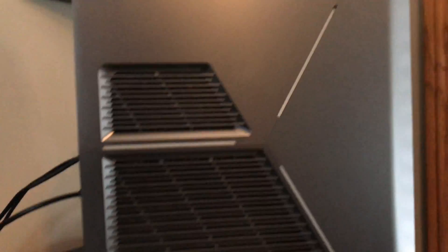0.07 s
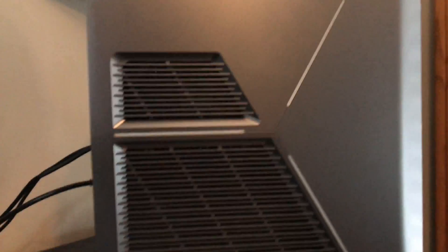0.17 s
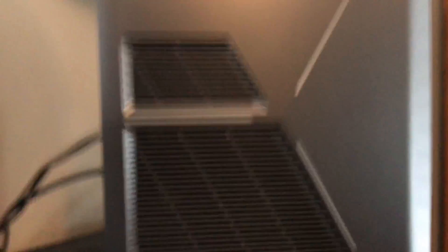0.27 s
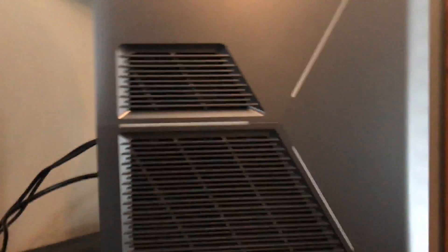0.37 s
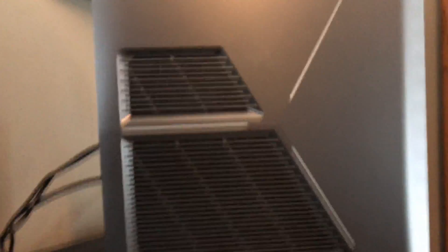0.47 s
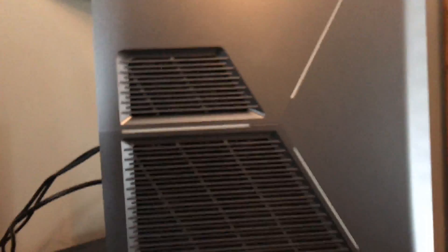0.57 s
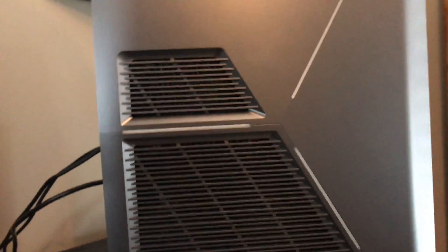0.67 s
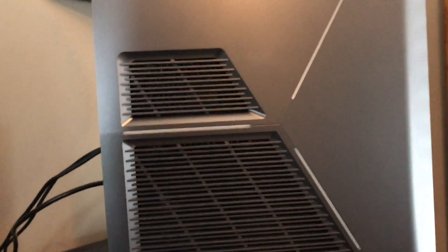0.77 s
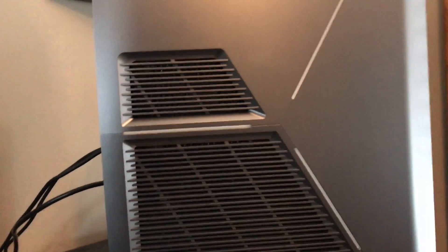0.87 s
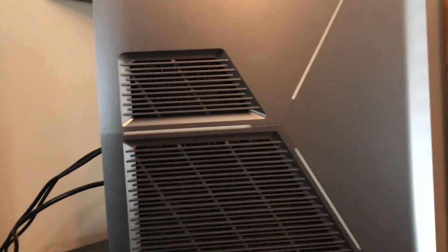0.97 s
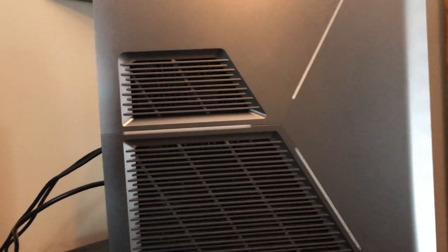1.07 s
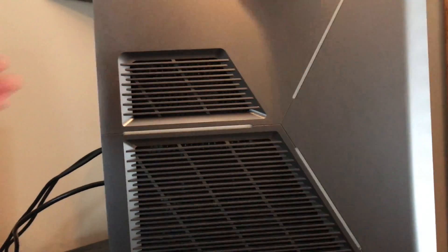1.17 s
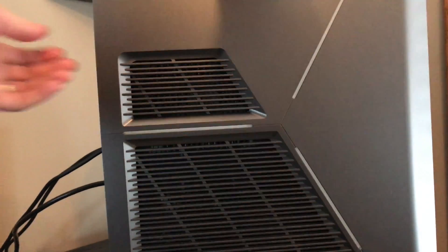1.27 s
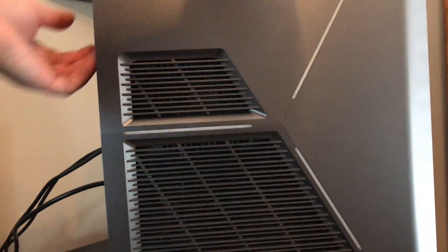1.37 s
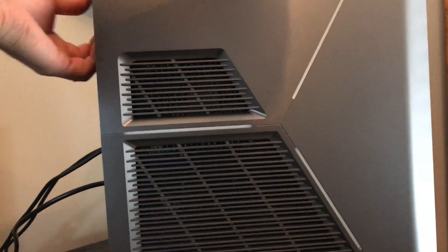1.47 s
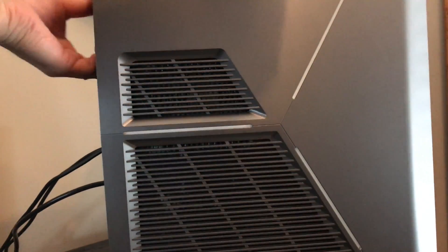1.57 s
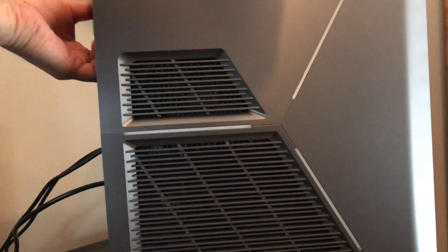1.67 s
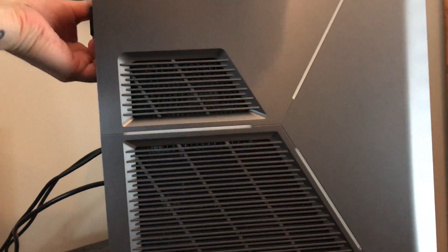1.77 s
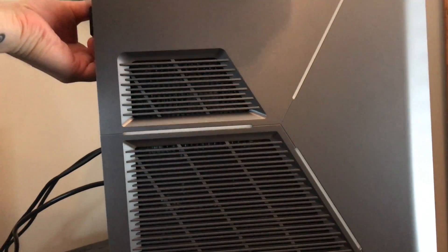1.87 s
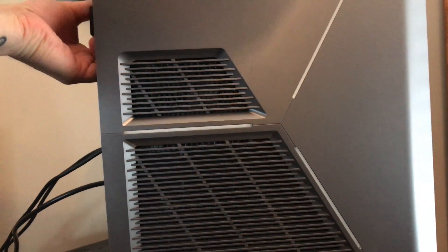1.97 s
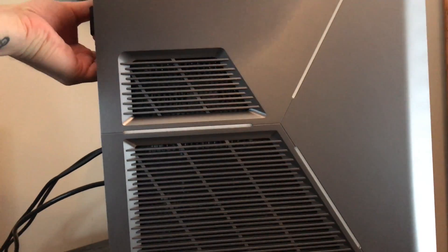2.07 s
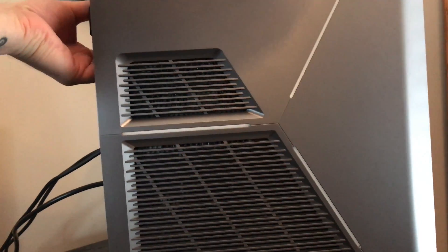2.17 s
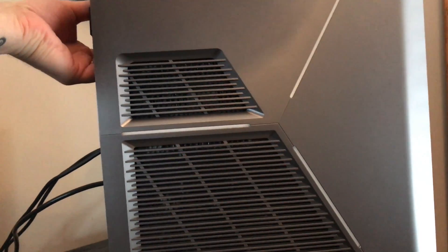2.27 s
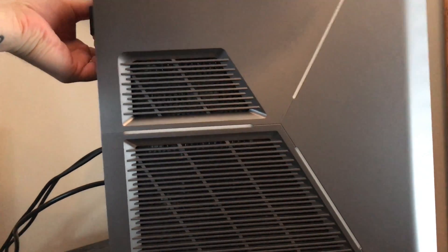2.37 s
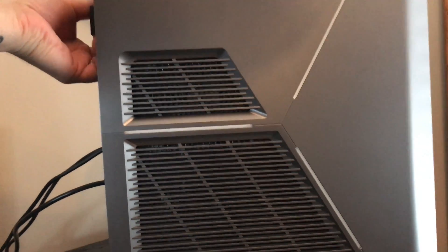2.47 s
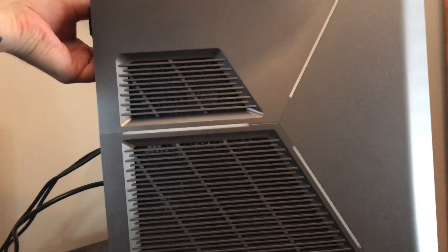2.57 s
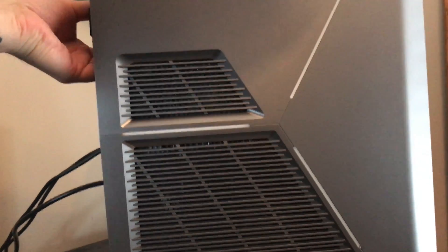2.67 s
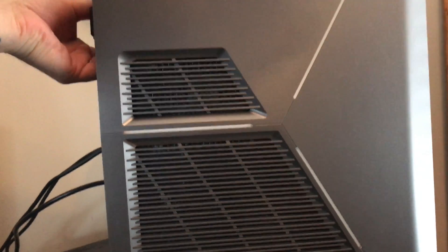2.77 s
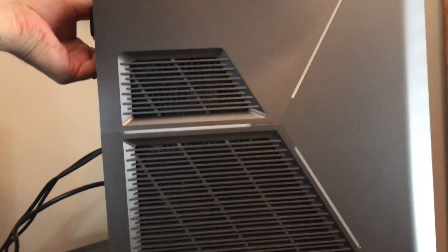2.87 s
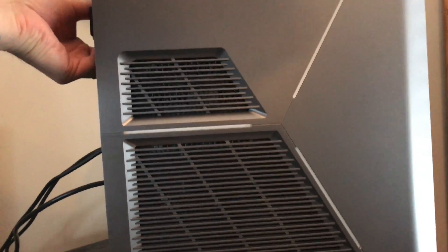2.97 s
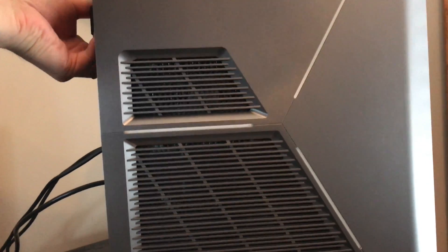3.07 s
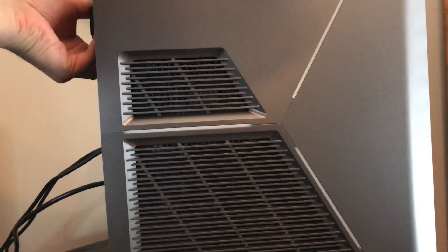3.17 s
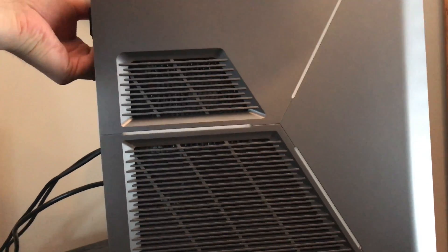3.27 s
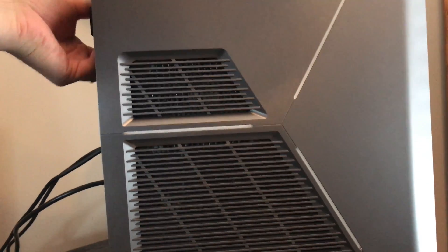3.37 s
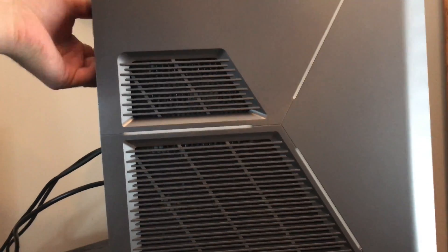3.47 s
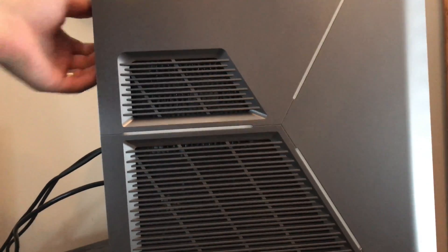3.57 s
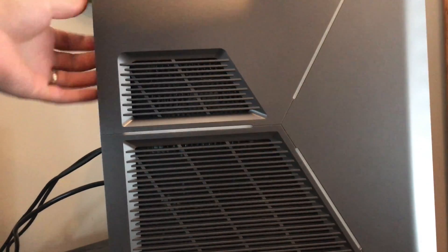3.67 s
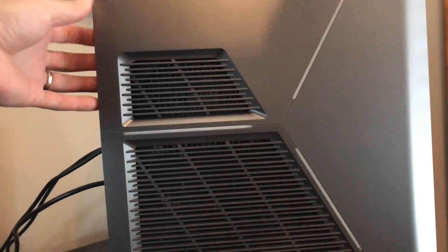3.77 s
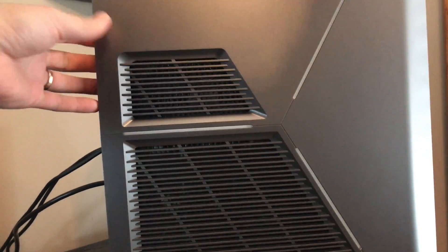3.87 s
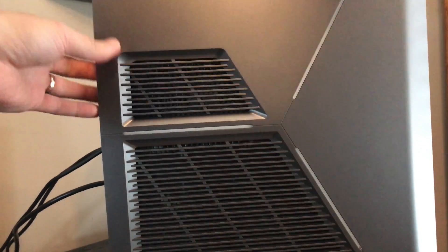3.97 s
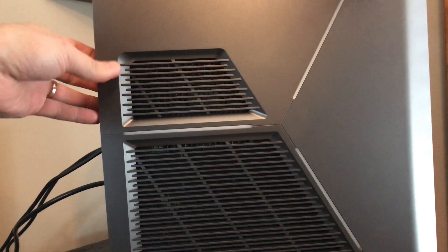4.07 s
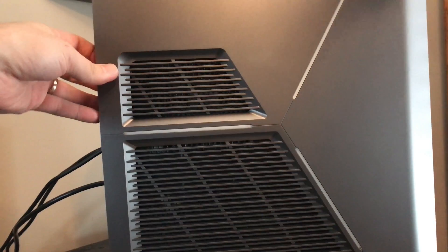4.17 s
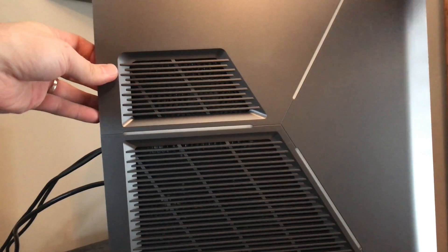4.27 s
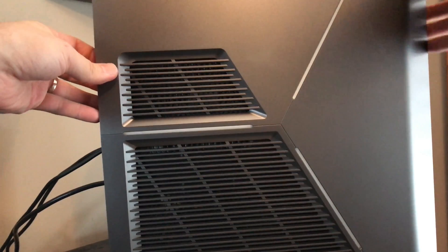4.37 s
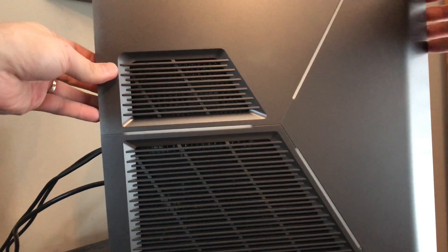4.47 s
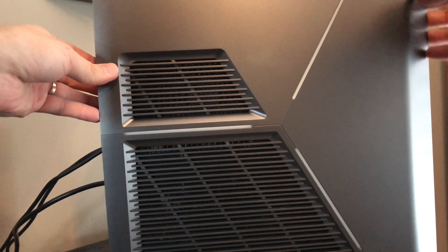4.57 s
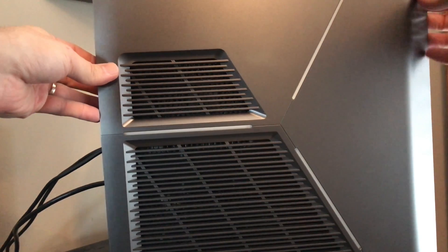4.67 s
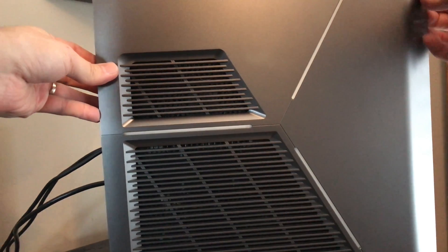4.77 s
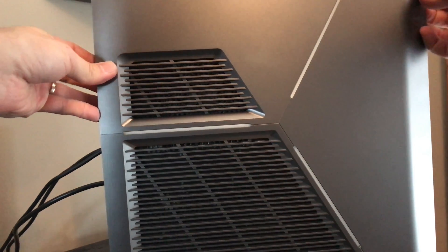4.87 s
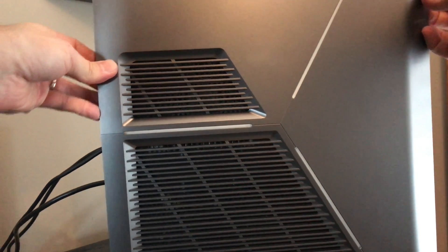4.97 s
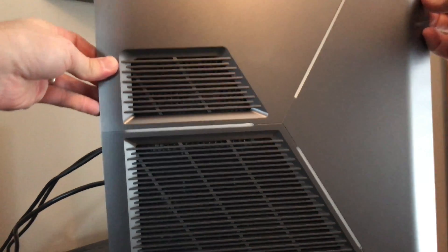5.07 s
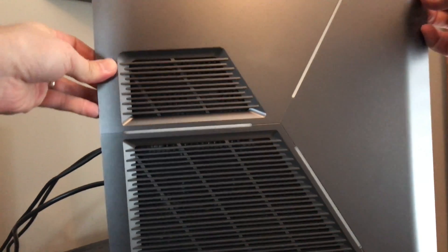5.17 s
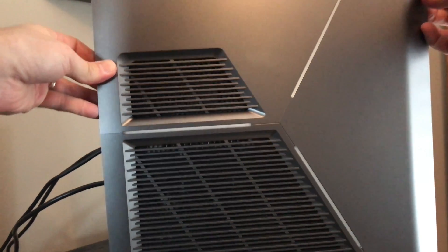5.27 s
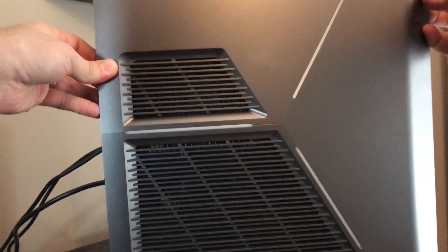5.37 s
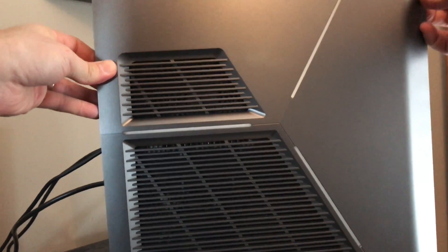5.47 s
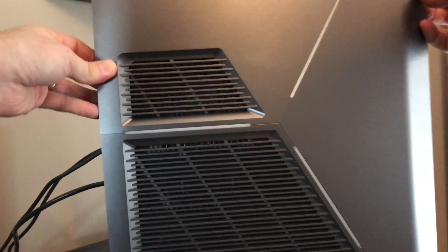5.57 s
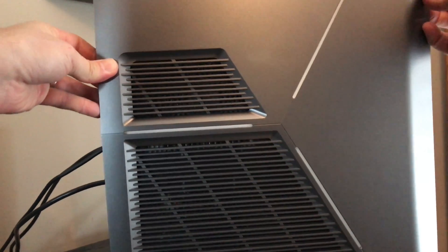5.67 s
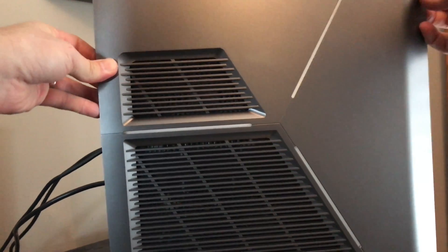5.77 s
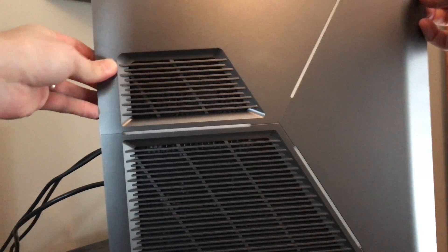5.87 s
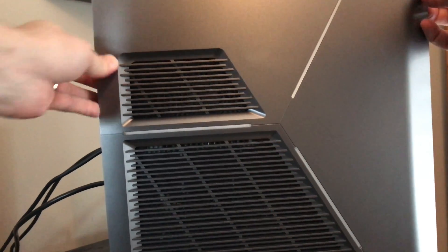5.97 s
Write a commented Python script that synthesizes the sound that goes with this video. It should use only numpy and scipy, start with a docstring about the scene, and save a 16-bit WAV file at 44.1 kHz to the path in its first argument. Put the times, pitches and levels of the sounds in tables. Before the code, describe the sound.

A faint, steady fan hum around a low-mid pitch with soft room air continues throughout, heard close up in a small room. For the first second there is little else beyond barely audible bumps. At about 1.3 s come tiny creaks, then until 2.4 s quiet fastener grating, finger scuffs, ticks and dull metal taps. Around 2.5 s a firmer clunk leads to a rapid clattering cluster at 2.65-2.8 s, with a bright latch snap and a loud thin clank at 2.69 s. Taps and soft thuds follow to 3.4 s. Knocks at 3.47 and 3.6 s begin an airy skin hiss along the paint, ending abruptly near 4.3 s. After faint handling, the loudest clank strikes at 5.12 s, short and ringing. A double rattle follows at 5.35 s, lighter knocks to 5.7 s, a crisp tap at 5.82 s, then mostly hum.

```python
"""Computer case side panel worked loose

Filtered noise and a wavering hum make the fans and room air; shaped noise makes skin hiss and panel drag.
Rubbed latch, thumbscrew and creaks are noise bursts driving decaying sine modes.
Taps, bumps, ticks and knocks, with two loud clanks as the panel jumps free, ring the sheet's modes
and a dense crowd of short ones; a diffuse tail gives the metal a small room."""
import sys
import numpy as np
from scipy import signal
from scipy.fft import rfft, irfft
from scipy.io import wavfile
from scipy.ndimage import uniform_filter1d

SR = 44100
rng = np.random.default_rng(int(sys.argv[2]) if len(sys.argv) > 2 else 0)


def persist_wave(psi):
    """Save psi, clipped to +-1, as 16-bit WAV."""
    counts = np.round(np.clip(psi, -1, 1) * 32767).astype(np.int16)
    wavfile.write(sys.argv[1], SR, np.atleast_2d(counts).T)


N = 264908


def amp(db):
    """Decibels to amplitude gain."""
    return 10 ** (np.asarray(db) / 20)


def evened(x):
    """Scales to rms 1."""
    return x / np.sqrt(np.mean(x ** 2) + 1e-20)


def read(points, hz):
    """Interpolates a table on a log-frequency axis."""
    f, value = np.transpose(points)
    return np.interp(np.log(hz + 1), np.log(f + 1), value)


def noise(spectrum, size):
    """Noise of rms 1 with the given spectrum."""
    hz = np.fft.rfftfreq(size, 1 / SR)
    shaped = rfft(rng.standard_normal(size)) * amp(read(spectrum, hz))
    return evened(irfft(shaped, size))


def wander(rate_hz):
    """Random drift of rms 1, low-passed near rate_hz."""
    hz = np.fft.rfftfreq(N, 1 / SR)
    slowed = rfft(rng.standard_normal(N)) / (1 + (hz / rate_hz) ** 4)
    return evened(irfft(slowed, N))


def band(x, lo_hz, hi_hz):
    """Causal band-pass."""
    sos = signal.butter(3, [lo_hz, min(hi_hz, .49 * SR)], "band", fs=SR, output="sos")
    return signal.sosfilt(sos, x)


def dying(x, age, t60s):
    """Lets each frequency region of x decay at its own rate."""
    hz, z = np.fft.rfftfreq(len(x), 1 / SR), rfft(x)
    centres, times = np.transpose(t60s)
    out = np.zeros(len(x))
    for one, t60 in zip(np.eye(len(centres)), times):
        share = read(np.c_[centres, one], hz)
        out += irfft(z * share, len(x)) * amp(-60 * age / t60)
    return out


def add(mix, s, sound):
    """Mixes a sound in at time s."""
    part = mix[max(round(s * SR), 0):][:len(sound)]
    part += sound[:len(part)]


def at_peak(x, db, size):
    """Scales x so that its loudest stretch of size samples has this rms level."""
    return x * amp(db) / np.sqrt(uniform_filter1d(x ** 2, size).max() + 1e-20)


def ringing(modes, t, age):
    """Decaying sine modes; random phases, and each contact point favours other modes."""
    hz, db, t60 = np.transpose(modes)[:, :, None]
    turn, spot = rng.random((2, len(modes), 1))
    level = amp(db + 6.2 * (spot - 1.0) - 60 * age / t60)
    return (level * np.sin(2 * np.pi * (hz * t + turn))).sum(0)


# Room air and fans. Each row: frequency in Hz, relative density in dB per Hz.
AIR_SPECTRUM = [(20, -22.5), (35, -14.5), (55, 5), (80, -4.5), (120, -5), (200, -6), (300, -8), (450, -18),
                (680, -20.5), (1100, -19), (1400, -27), (2400, -28.5), (5000, -38), (10000, -43.5),
                (16000, -41)]
# Hum partials. Each row: centre frequency in Hz, rms level in dB before the swell.
HUM_PARTIALS = [(221.3, -49), (74, -69.5), (661, -76)]
# Slow hum level. Each row: time in seconds, gain in dB.
HUM_GAIN = [(0, -1), (.3, -0.5), (.62, -0.5), (.9, -1), (3.2, 0), (6, .5)]


def machine():
    """Hum partials wavering in pitch and level, in the low noise of the fans and the room."""
    hum = np.zeros(N)
    for centre_hz, db in HUM_PARTIALS:
        level = amp(db + .5 * wander(4.8)) * np.sqrt(2)
        hz = centre_hz + .5 * wander(3.0)
        hum += level * np.sin(2 * np.pi * np.cumsum(hz) / SR)
    swell = amp(np.interp(np.arange(N) / SR, *np.transpose(HUM_GAIN)))
    air = amp(-58 + 0.53 * wander(17)) * noise(AIR_SPECTRUM, N)
    return hum * swell + air


# Tail decay. Each row: frequency in Hz, t60 in seconds.
TAIL_T60 = [(150, 0.72), (500, 0.36), (2500, 0.25), (7000, 0.3), (14000, 0.19)]


def room(x):
    """Small room: a diffuse tail that builds up over the first milliseconds."""
    t = np.arange(SR // 2) / SR
    build_up = 1 - np.exp(-(t / 0.015) ** 2)
    tail = dying(rng.standard_normal(len(t)), t, TAIL_T60) * build_up
    return signal.fftconvolve(x, tail / np.linalg.norm(tail))[:N]


def rubbed(rubs, modes):
    """Friction noise swells and fades exponentially, driving a small part's modes, which ring on."""
    t, out = np.arange(SR // 4) / SR, np.zeros(N)
    lead_s = .03
    for s, db, build_s in rubs:
        friction = rng.standard_normal(len(t)) * np.exp(-abs(t - lead_s) / abs(build_s))
        sound = signal.fftconvolve(friction, ringing(modes, t, t))
        add(out, s - lead_s, at_peak(sound, db, size=180))
    return out


# Case creaks as the hand arrives.
# Each row: friction peak in seconds, level in dB, build-up in seconds, pitch in Hz.
CREAK_EVENTS = [(1.29, -57.5, 0.016, 640), (1.355, -59, .003, 2750)]
CREAK_T60_S = 0.024


def creaks():
    """Each creak is a short rub on a single resonance."""
    out = np.zeros(N)
    for s, db, build_s, hz in CREAK_EVENTS:
        out += rubbed([(s, db, build_s)], [(hz, 0, CREAK_T60_S)])
    return out


# Thumbscrew grating as it turns. Each row: friction peak in seconds, level in dB, build-up in seconds.
SCREW_EVENTS = [(1.432, -45, 0.0073), (1.527, -47.5, 0.013), (1.787, -42, 0.0048), (2.477, -34.5, 0.00065)]
# Thumbscrew modes. Each row: frequency in Hz, relative level in dB, t60 in seconds.
SCREW_MODES = [(1136, -8, 0.044), (1433, -7.5, 0.092), (1545, -5, 0.061), (1900, -8, 0.057)]


def thumbscrew():
    """Friction bursts ring the thumbscrew's modes."""
    return rubbed(SCREW_EVENTS, SCREW_MODES)


# Latch at the back edge. Each row: friction peak in seconds, level in dB, build-up in seconds.
LATCH_EVENTS = [(2.474, -41, .005), (2.485, -40, .004), (2.69, -28, .002), (2.773, -38, .002)]
# Latch modes. Each row: frequency in Hz, relative level in dB, t60 in seconds.
LATCH_MODES = [(4080, -1, .022), (4180, 0, .03), (4260, -7, .08), (4540, -2, .025), (7040, -14, .03),
               (7950, -11, .025)]


def latch():
    """Friction bursts ring the latch's modes."""
    return rubbed(LATCH_EVENTS, LATCH_MODES)


# Clearest panel modes. Each row: frequency in Hz, relative level in dB, t60 in seconds.
PANEL_MODES = [(145.4, -8.5, 0.25), (229.4, 1.5, 0.34), (288, 0.5, 0.13), (337.3, 3.5, 0.26),
               (365.8, 2, 0.15), (432, 0, 0.27), (568.4, -5.5, 0.16), (714, -6, 0.28), (783, -6, 0.2),
               (952, -3.5, 0.21), (1134, 3.5, 0.13), (1271, -7, 0.19), (1388, 4, 0.15), (1600, -8.5, 0.064),
               (1774, -4, 0.23), (1960, -8.5, 0.38), (2317, 0, 0.15), (2475, 1.5, 0.097),
               (2680, -2.5, 0.13), (2800, -4, 0.12), (3056, 3.5, 0.064), (4070, -5, 0.13), (6250, -24, .12)]


def panel_ring(t, age):
    """The panel's separate modes, decaying with age."""
    return ringing(PANEL_MODES, t, age)


# Crowd of short modes between them. Each row: frequency in Hz, relative density in dB per Hz.
CROWD_SPECTRUM = [(50, -12.5), (110, -7.5), (175, -9), (260, 0), (420, -3), (650, -9), (850, -5.5),
                  (1150, -4), (1950, -6.5), (3000, -10), (4000, -11), (4900, -17.5), (5600, -15),
                  (10000, -22), (16000, -24)]


def sheet_crowd(size):
    """Modes too dense to separate, as steady shaped noise."""
    return noise(CROWD_SPECTRUM, size)


HOLD_FROM_S, HOLD_UNREST_DB, HOLD_UNREST_HZ = 1.4, 0.5, 7
HOLD_DRAG_DB, HOLD_HISS_DB = -69.5, -78.5  # nominal


def hold():
    """Drag and hiss power of hands resting on the case, never quite still."""
    unrest = amp(HOLD_UNREST_DB * wander(HOLD_UNREST_HZ))
    held = (np.arange(N) / SR > HOLD_FROM_S) * unrest
    return (held * amp(HOLD_DRAG_DB)) ** 2, (held * amp(HOLD_HISS_DB)) ** 2


# One long hand stroke. Each row: time in seconds, nominal skin hiss in dB, nominal sheet drag in dB.
STROKE_COURSE = [(3.47, -66, -55), (3.56, -57, -56), (3.65, -49.5, -58), (3.8, -52, -63), (3.97, -48, -68),
                 (4.1, -48.5, -59), (4.19, -46.5, -57), (4.21, -46, -47), (4.255, -51.5, -50),
                 (4.3, -77, -66)]


def stroke():
    """Drag and hiss power of one hand stroke along the panel."""
    t = np.arange(N) / SR
    times, hiss_db, drag_db = np.transpose(STROKE_COURSE)
    stroking = (t > times[0]) & (t < times[-1])
    drag = stroking * amp(np.interp(t, times, drag_db)) ** 2
    hiss = stroking * amp(np.interp(t, times, hiss_db)) ** 2
    return drag, hiss


# Brief noise swells: scuffs of the fingers, and at 5.119 s a swell around the big clank.
# Each row: middle in seconds, half-length in seconds, nominal drag in dB, nominal hiss in dB.
SWELL_EVENTS = [(.3, 0.16, -69, -93), (1.122, 0.13, -68, -71.5), (1.57, 0.34, -57.5, -62),
                (1.754, 0.049, -55, -66), (1.829, .1, -54, -62), (1.962, 0.088, -63, -65),
                (2.242, 0.057, -49, -56.5), (2.357, 0.064, -59, -66), (2.476, 0.079, -55.5, -56.5),
                (2.65, 0.052, -46.5, -53), (2.924, 0.091, -55.5, -65), (3.363, 0.039, -53.5, -61.5),
                (3.65, .05, -60, -65), (4.605, .15, -64.5, -54.5), (4.838, 0.17, -60.5, -58.5),
                (5.119, 0.043, -44.5, -61), (5.848, .05, -52, -74), (5.976, 0.05, -60.5, -76)]


def brief_swells():
    """Drag and hiss power of brief noise swells, each a squared Hann window."""
    drag, hiss = np.zeros(N), np.zeros(N)
    for s, half_s, drag_db, hiss_db in SWELL_EVENTS:
        swell = np.hanning(round(2 * abs(half_s) * SR)) ** 2
        add(drag, s - half_s, swell * amp(drag_db) ** 2)
        add(hiss, s - half_s, swell * amp(hiss_db) ** 2)
    return drag, hiss


SHIVER_DB, SHIVER_FADE_DB_PER_S, SHIVER_RISE_S = -23.5, 62.5, .015  # nominal, relative to the clack


def shivers():
    """Drag power of the loose panel shivering in its slots after each knock."""
    drag = np.zeros(N)
    age = np.arange(SR) / SR
    shiver = (1 - np.exp(-age / SHIVER_RISE_S)) * amp(SHIVER_DB - SHIVER_FADE_DB_PER_S * age)
    for s, clack_db, *_ in KNOCK_EVENTS:
        add(drag, s, (shiver * amp(clack_db)) ** 2)
    return drag


def friction_levels():
    """Drag and hiss in dB over time; all contributions add in power."""
    hold_drag, hold_hiss = hold()
    stroke_drag, stroke_hiss = stroke()
    swell_drag, swell_hiss = brief_swells()
    drag = hold_drag + stroke_drag + swell_drag + shivers()
    hiss = hold_hiss + stroke_hiss + swell_hiss
    return 10 * np.log10(drag + 1e-12), 10 * np.log10(hiss + 1e-12)


# Skin on paint. Each row: frequency in Hz, relative density in dB per Hz.
SKIN_SPECTRUM = [(1500, -13), (2800, -7.5), (4100, -5.5), (4800, -8), (5800, -5), (9000, -5.5), (10400, -7),
                 (11800, -2), (15000, -5.5), (16000, -2)]


def sliding():
    """Skin hisses over the paint, brighter when louder; dragging stirs the sheet in tiny slips."""
    drag_db, hiss_db = friction_levels()
    speed = amp(np.minimum(hiss_db + 52.0, 0))
    bright = 0.95 * speed * band(noise(SKIN_SPECTRUM, N), 11500, 17000)
    hiss = (noise(SKIN_SPECTRUM, N) + bright) * amp(hiss_db - 1.5 + .7 * wander(60))
    t = np.arange(SR // 4) / SR
    slips = rng.standard_normal(N) * amp(2.5 * wander(90))
    modes = evened(signal.fftconvolve(slips, panel_ring(t, t))[:N])
    scuff = sheet_crowd(N) * amp(2.25 * wander(70))
    return hiss + band(scuff + 0.56 * modes, 390, 6700) * amp(drag_db - 1.0)


# Decay of the crowd. Each row: frequency in Hz, t60 in seconds.
CROWD_T60 = [(150, 0.11), (400, 0.15), (1000, 0.14), (3000, 0.098), (7000, 0.074), (14000, 0.078)]


def knock(clack_db, thump_db, tick_db, chatter_s):
    """A blow chatters for a moment, then the sheet rings out; three bands are levelled apart."""
    t = np.arange(16384) / SR
    age = np.maximum(t - abs(chatter_s), 0)
    contacts = np.r_[0, rng.random(3)] * abs(chatter_s) * 2.4
    since = t - contacts[:, None]
    cracks = ((since >= 0) * np.exp(-abs(since) / 0.0013)).max(0)  # every contact is a brief crack
    crowd = dying(sheet_crowd(len(t)), age, CROWD_T60) * (1 + 0.71 * cracks)
    ring = crowd + amp(-13) * panel_ring(t, age)
    softness = np.clip((-25.5 - clack_db) / 20, .05, 1)  # light touches are cushioned by the fingers
    ring = ring * (1 - np.exp(-t / (0.12 * softness * abs(chatter_s) + 1e-5)))
    late = ring * (1 - np.exp(-t / 0.0021))  # the slow bending waves arrive last
    thump = at_peak(band(late, 40, 583), thump_db, size=350)
    clack = at_peak(band(ring, 650, 3000), clack_db, size=180)
    tick = at_peak(band(ring, 3600, 19000), tick_db, size=180)
    return thump + clack + tick


def struck(blows):
    """Lays out knocks given as time and knock settings."""
    out = np.zeros(N)
    for s, *blow in blows:
        add(out, s, knock(*blow))
    return out


# A nail or ring just touching metal. Each row: start in seconds, tick level in dB.
TICK_EVENTS = [(1.868, -61), (2.067, -68), (2.102, -60.5), (3.046, -60.5), (3.108, -59), (3.3, -67),
               (3.497, -56), (5.072, -61.5), (5.586, -65), (5.686, -70), (5.727, -67)]
TICK_BODY_DB, TICK_CHATTER_S = -3, 0.0054  # body relative to the tick


def ticks():
    """Hard, tiny contacts: the treble is stronger than the sheet's answer."""
    return struck([(s, db + TICK_BODY_DB, db + TICK_BODY_DB, db, TICK_CHATTER_S)
                   for s, db in TICK_EVENTS])


# Flat of a hand on the sheet. Each row: start in seconds, thump level in dB.
BUMP_EVENTS = [(.355, -54), (.506, -58), (2.104, -51), (2.222, -43), (2.612, -42), (3.082, -43.5),
               (3.097, -45), (3.366, -47), (4.626, -48.5), (4.781, -44), (5.021, -52), (5.295, -37),
               (5.59, -48), (5.663, -50.5), (5.703, -42.5)]
BUMP_CLACK_DB, BUMP_TICK_DB, BUMP_CHATTER_S = -10.5, -22, .0055  # levels relative to the thump


def bumps():
    """Broad, soft contacts give mostly bass."""
    return struck([(s, db + BUMP_CLACK_DB, db, db + BUMP_TICK_DB, BUMP_CHATTER_S)
                   for s, db in BUMP_EVENTS])


# Fingertips on the sheet. Each row: start in seconds, clack level in dB.
TAP_EVENTS = [(1.734, -48), (2.068, -51), (2.4, -54.5), (2.85, -40), (2.864, -37.5), (2.927, -43.5),
              (2.97, -47), (3.23, -50), (3.388, -55.5), (3.564, -48), (3.645, -50), (4.701, -51),
              (4.903, -47.5)]
TAP_THUMP_DB, TAP_TICK_DB, TAP_CHATTER_S = 1, -16, 0.0023  # levels relative to the clack


def taps():
    """Fingertip contacts give a dull clack with little treble."""
    return struck([(s, db, db + TAP_THUMP_DB, db + TAP_TICK_DB, TAP_CHATTER_S)
                   for s, db in TAP_EVENTS])


# Steel edge in its slots. Each row: start in seconds, mid clack level in dB, low thump level in dB,
# high tick level in dB, chatter time in seconds.
KNOCK_EVENTS = [(1.419, -48.5, -49, -48.5, 0.016), (1.514, -44, -46.5, -43.5, 0.0025),
                (1.613, -56, -67, -51.5, 0.014), (1.783, -41, -45.5, -54, .014),
                (2.24, -46.5, -38.5, -56, 0.021), (2.475, -37.5, -33.5, -44, 0.012),
                (2.558, -48, -46.5, -52, 0.0026), (2.652, -26.5, -29, -35, 0.0064),
                (2.672, -32.5, -35, -32, 0.0052), (2.682, -27.5, -29, -25.5, 0.0023),
                (2.687, -20.5, -30.5, -21.5, .0012), (2.705, -32, -28.5, -48, 0.0059),
                (2.768, -33, -36, -33, 0.004), (2.786, -33.5, -33.5, -44, 0.0089),
                (2.89, -52, -49, -43.5, 0.0023), (2.9, -39.5, -40, -43, 0.0055),
                (3.465, -37, -30, -52.5, 0.011), (3.614, -39.5, -38.5, -46.5, 0.0098),
                (4.459, -57.5, -52, -55, 0.016), (5.125, -15.5, -21.5, -17, .0079),
                (5.277, -43, -50, -48.5, 0.0087), (5.342, -27, -27, -32, 0.0027),
                (5.351, -25.5, -36, -28.5, 0.0069), (5.457, -39, -39.5, -48, 0.0099),
                (5.817, -40.5, -41.5, -39.5, 0.0024)]


def knocks():
    """The panel's edge hits and chatters in its slots, ringing the sheet."""
    return struck(KNOCK_EVENTS)


def scene():
    """Panel, fasteners and hands over the machine; only the metal feeds the room tail."""
    fasteners = creaks() + thumbscrew() + latch()
    metal = fasteners + ticks() + bumps() + taps() + knocks()
    return (machine() + amp(-15.0) * room(metal) + sliding() + metal)[None]


EDGE_HZ = 16100


def record(dry):
    """Linear-phase low-pass at the upper band edge."""
    lowpass = signal.firwin(511, EDGE_HZ, window=("kaiser", 9), fs=SR)
    return signal.oaconvolve(dry, lowpass[None], "same")


dry = scene()
out = record(dry)
persist_wave(out)
```